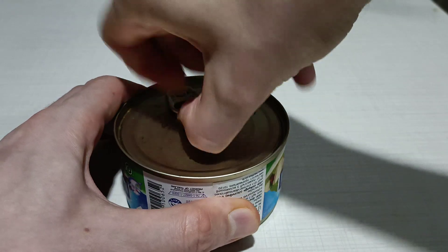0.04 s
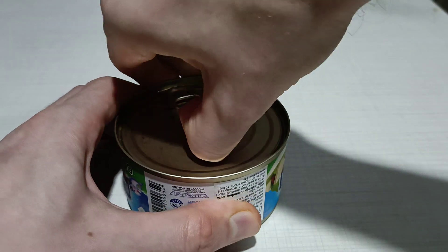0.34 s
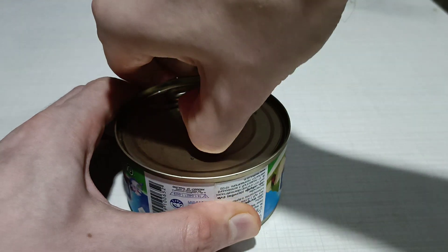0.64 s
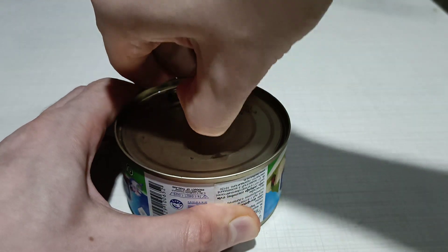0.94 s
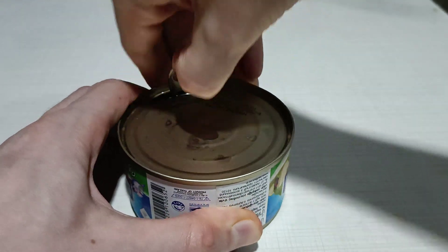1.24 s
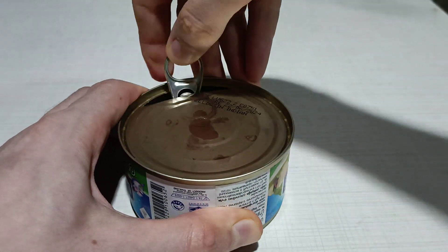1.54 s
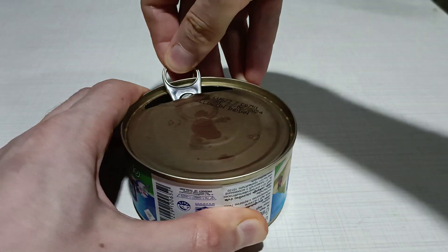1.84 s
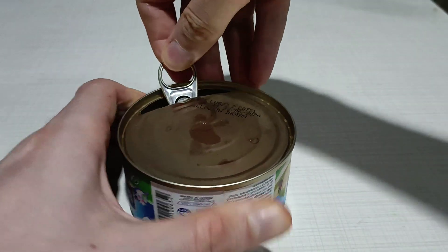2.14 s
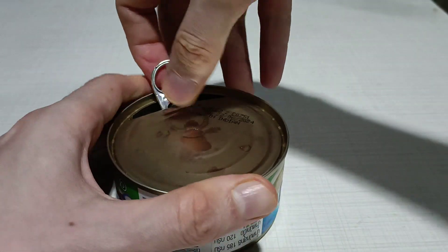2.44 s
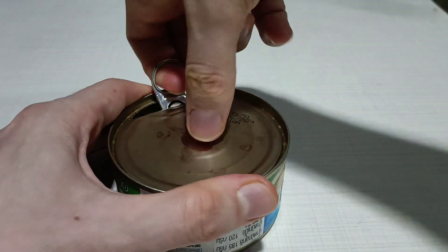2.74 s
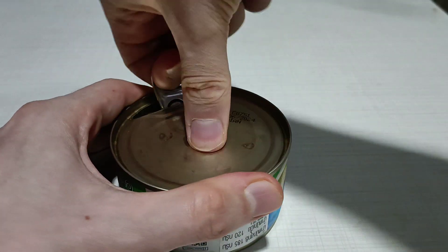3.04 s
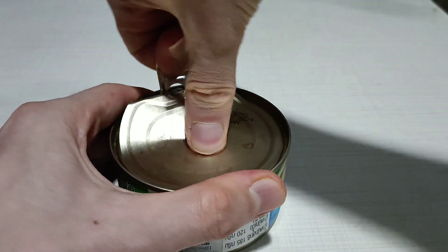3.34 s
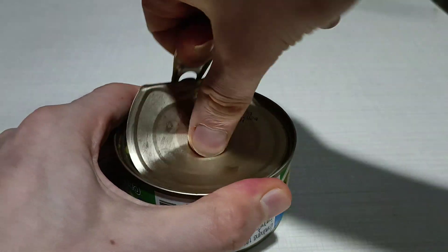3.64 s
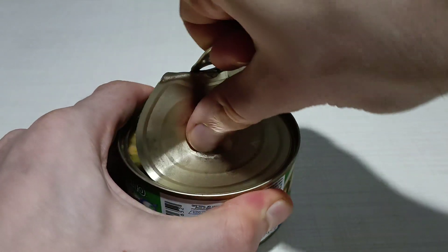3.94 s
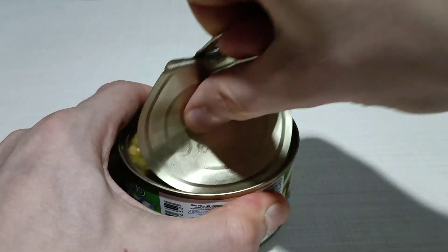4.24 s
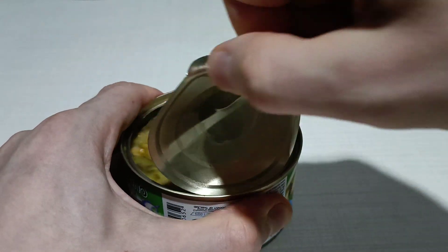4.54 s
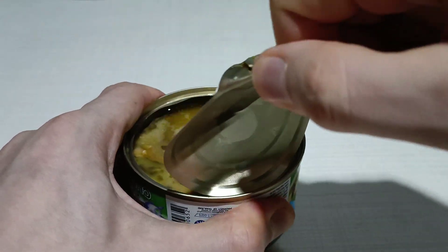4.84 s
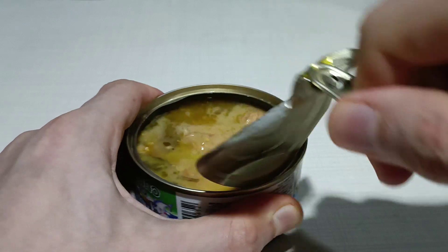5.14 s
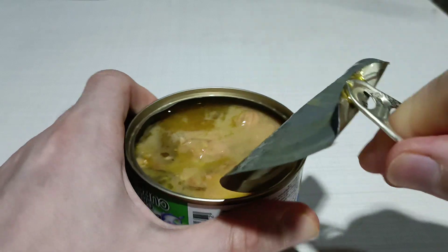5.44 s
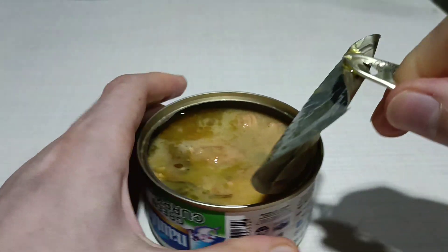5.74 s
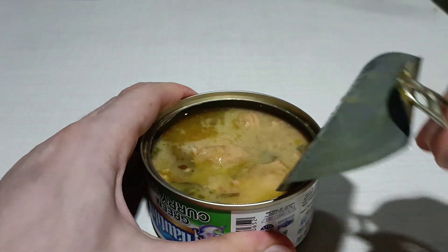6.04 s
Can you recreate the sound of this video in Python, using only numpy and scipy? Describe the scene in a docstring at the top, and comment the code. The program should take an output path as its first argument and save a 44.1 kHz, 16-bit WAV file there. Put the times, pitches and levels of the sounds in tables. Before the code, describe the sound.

A ring-pull food tin is opened on a table, close to the microphone in a small, quiet room. The tab clicks, air hisses briefly through the slit, and the lid gives a loud metallic pop. After faint ticks and finger rubbing, the seal cracks and the lid peels back in short, crackling pulls with thin squeaks. It snaps off at the rim, and the full tin knocks dully on the table.

```python
"""Opening a ring-pull food tin

On a table in a small room, close to a stereo pair and a little nearer the left microphone.
The tab pierces the lid with a pop, air hisses through the slit, and the score cracks open.
The lid peels back in six pulls, runs of tiny fractures that swell and stall; it snaps at the rim,
and the full tin knocks on the table. Behind it lie a short echo and the room's faint rumble and hum."""
import sys
import numpy as np
from scipy import signal
from scipy.fft import rfft, irfft
from scipy.io import wavfile
from scipy.ndimage import uniform_filter1d

SR = 44100
rng = np.random.default_rng(int(sys.argv[2]) if len(sys.argv) > 2 else 0)


def output_pcm(signal):
    """Save a mono or channel-first signal as 16-bit PCM at the path in sys.argv[1].

    Samples are clipped to [-1, 1] before scaling.
    """
    pcm = np.clip(np.atleast_2d(signal).T, -1, 1) * 32767
    wavfile.write(sys.argv[1], SR, np.round(pcm).astype(np.int16))


N = 267687
RING_T = np.arange(4096) / SR  # time axis of one ring, in seconds
BLOW_S = .006  # span over which a blow's level counts
TOP_HZ = 16050

# Pops of the taut lid. Each row: start in seconds, shell level in dB, lid ring in dB over the shell,
# treble tilt in dB per octave, lid pitch in Hz, tab ring in Hz, tab ring in dB over the shell.
LID_POPS = [ (.6216, -26, 3.5, 0, 872, 4250, 0), (1.142, -11.5, -14, -2, 806, 8230, 4),
            (1.1463, -16.5, -1.5, -7.5, 853, 8670, -3.5), (2.2555, -44, -13.5, 8, 890, 13000, 2.5),
            (3.286, -25, -30, 1, 870, 4710, -4), (3.289, -29, 3, -5, 866, 9800, -0.5), ]
# Pulls on the lid. Each row: start, moment the score gives way, length of the run and end in seconds,
# run level in dB, lid ring in dB over the shell, treble tilt in dB per octave, factor on lid pitch.
LID_PULLS = [ (3.293, 3.303, 0.029, 3.425, -34, 0.5, -10, 1.03),
             (3.577, 3.622, 0.018, 3.70, -46, 1, -11, .97), (3.71, 3.711, .012, 3.88, -44, 2.5, -6.5, 1.58),
             (4.086, 4.12, 0.089, 4.226, -52, 1.5, -11.5, 1.28),
             (4.23, 4.263, 0.028, 4.335, -36.5, -7, -9, 1.22),
             (4.919, 4.938, 0.03, 4.966, -46, -3.5, -4.5, 0.88), ]
# Longer pieces of the score letting go. Each row: start in seconds, level in dB.
SCORE_SNAPS = [(3.3179, -39), (3.3356, -39.5), (3.3427, -49), (3.383, -41.5), (3.4123, -39), (3.558, -63),
               (3.577, -59), (3.598, -56), (3.6066, -44), (3.623, -41), (3.663, -49), (3.7147, -42.5),
               (3.863, -62.5), (4.089, -53), (4.1205, -50), (4.135, -43.5), (4.234, -49), (4.9615, -32.5)]
# Dull thuds of the full tin: low body under pops and tears, and knocks on the table.
# Each row: start in seconds, level in dB, factor on the pitch.
TIN_THUDS = [(1.144, -24.5, 0.75), (2.565, -55, 0.45), (3.96, -51.5, 0.75), (4.291, -35.5, 0.79),
             (4.373, -51.5, 0.65), (4.921, -48, .52), (4.968, -46, 0.46), (5.0344, -38.5, .33),
             (5.036, -44.5, 1.65), (5.424, -49, 0.92), (5.546, -52, 1.1), (5.567, -29, 1.03)]
# Air through the slit. Each row: start, peak and end in seconds, peak level in dB.
AIR_PUFFS = [(0.61, 0.728, .90, -51.5), (0.851, .96, 1.08, -43)]
# Gliding tones. Each row: start and end in seconds, first pitch, last pitch and width in Hz, level in dB.
SLIT_WHISTLES = [(.955, .988, 5290, 3710, 610, -51), (.992, 1.012, 4900, 2930, 249.3, -44.5)]
HEADSPACE_HUM = [(.90, 1.09, 809.4, 700, 50.22, -69)]  # the space under the lid, as the air passes
STEEL_SQUEALS = [(.2, .36, 9300, 10400, 200, -82), (.32, .45, 10400, 8600, 200, -82),
                 (2.93, 3.16, 8600, 8800, 180, -77), (3.14, 3.28, 9100, 10300, 180, -75),
                 (3.08, 3.28, 11900, 13300, 180, -73), (4.11, 4.22, 3500, 3400, 350, -56),
                 (4.248, 4.276, 4000, 4350, 250, -46), (4.88, 4.96, 9500, 9300, 500, -70),
                 (4.935, 4.972, 4200, 4050, 500, -45)]
# Ticks of the strained tab. Each row: start in seconds, level in dB, treble tilt in dB per octave.
TAB_TICKS = [(1.421, -61, 12.5), (1.487, -52.5, 1), (1.5, -47.5, 3), (1.62, -62, 9.5), (2.195, -57.5, -5.5),
             (3.185, -52, 0), (3.196, -53.5, 11), (3.226, -53, -0.5), (3.2702, -44.5, 1.5),
             (5.1615, -54.5, 19), (5.19, -63, 12)]
# Firmer nudges on the closed lid. Each row: start in seconds, level in dB.
FINGER_NUDGES = [(0.37, -59), (1.815, -53), (2.178, -58.5), (2.893, -57), (3.0, -51.5)]
# Skin sliding on tin. Each row: start and end in seconds, level in dB before the trim.
GRIP_SLIDES = [(0.055, 0.153, -61), (1.993, 2.18, -57.5), (2.195, 2.323, -57.5), (2.767, 2.893, -52.5),
               (5.874, 5.983, -61)]

# Modes of the taut lid. Each row: factor on its pitch, level in dB, seconds to fall 60 dB.
TAUT_LID_MODES = [ (1, 0, .04), (1.3, -25, .035), (1.55, -23.5, .035), (1.94, -20.5, .03), (3.1, -20, .035),
                  ]
# Modes of torn lid and full tin. Each row: frequency in Hz, level in dB, seconds to fall 60 dB.
TORN_LID_MODES = [(300, -19, .04), (420, -14, .025), (560, -8, .02), (760, -4, .025), (885, 0, .035),
                  (1030, -5, .03), (1175, -2, .035), (1440, -6, .035), (1700, -7, .03), (1890, -9, .03),
                  (2600, -13, .02)]
FULL_TIN_MODES = [(338, -15.5, .04), (480, -10, .02), (750, -2.5, 0.036), (860, -3, 0.035),
                  (1150, -10.5, 0.0091), (1440, -9, .02), (1620, -11, .015), (1898, -7.5, 0.019),
                  (2270, -11.5, 0.01), (2890, -20.5, 0.016)]
# Clear modes of the tin's wall. Each row: frequency in Hz, level in dB.
WALL_MODES = [(2540, -12), (2720, -9), (3870, -7), (4175, -2.5), (4370, 0), (4660, -2), (5380, -12),
              (7960, -5), (8420, -8), (8820, -6), (9070, -6)]
# Noise colours of the sources. Each row: frequency in Hz, relative spectral density in dB.
SHELL_SPECTRUM = [(300, -24), (900, -16.5), (2000, -9.5), (2700, -12.5), (3250, -4), (4350, -1.5),
                  (5100, -11.5), (6200, -2.5), (7200, -10), (8100, 1.5), (9400, 1), (11000, -4.5),
                  (12300, -7), (13400, 2.5), (16000, -5)]
CLUNK_SPECTRUM = [(150, -17.5), (420, 2), (560, -9.5), (820, 5.5), (1200, -7), (1650, -4), (2500, -15),
                  (3600, -29.5), (6000, -43)]
HISS_SPECTRUM = [(500, -31.5), (2500, -21), (3800, -4.5), (5500, -4), (7200, -10), (8800, 6), (11500, -4),
                 (13800, -0.5), (16000, -6)]
SKIN_SPECTRUM = [(500, 6.5), (1600, -6), (3300, -1), (4500, -0.5), (6500, -12), (9500, 4.5), (12500, -7),
                 (16000, -2.5)]
ROOM_TONE_SPECTRUM = [(25, -19.5), (50, -11), (90, 0.5), (160, -12.5), (230, -4.5), (400, -12), (630, -21),
                      (900, -22.5), (1300, -27.5), (2500, -32), (4500, -32), (5300, -40.5), (7200, -40.5),
                      (8500, -33), (12000, -39), (13500, -31)]

# The room's hum. Each row: frequency in Hz, width in Hz, level in dB.
ROOM_HUM = [(90.1, 74, -75.5), (134.1, 11, -69.5), (214.5, 31, -76)]
# The tin's balance at the microphones. Each row: frequency in Hz, left minus right in dB.
MIC_BALANCE = [(300, 4), (850, -3), (1500, 2.5), (2700, 4), (4500, 3.5), (8500, 8.5), (14000, 7.5)]
# Decay of the room's echo. Each row: frequency in Hz, seconds to fall 60 dB.
ECHO_T60 = [(150, 0.31), (700, 0.29), (2000, 0.21), (4500, 0.3), (9000, 0.33), (16000, .24)]
# Colour of the room's echo. Each row: frequency in Hz, gain in dB.
ECHO_COLOUR = [(100, 4), (700, -2.5), (2500, 3), (4500, -6.5), (9000, -9), (12000, -6), (16000, -10.5)]


def pops(tab_width_hz=1100, snap_t60=.011):
    """The score gives way: the tab rings and the taut lid sounds like a small drum, more to the right."""
    out = np.zeros((2, N))
    for start, db, lid_db, tilt_db, lid_hz, tab_hz, tab_db in LID_POPS:
        drum = amp(lid_db) * low_cut(ring(TAUT_LID_MODES, lid_hz, scatter_db=1), hz=560, order=3)
        tab = np.array([fuzzy_tone(np.full(len(RING_T), tab_hz), tab_width_hz) for side in range(2)])
        tab = per_blow(tab * amp(-60 * RING_T / snap_t60))
        steel = shell(tilt_db, snap_t60) + amp(tab_db) * tab
        add(out, start, amp(db) * (steel * amp([[-3], [2]]) + drum * amp([[-5], [1.5]])))
    return out


def pulls(slips_per_s=600, spread_db=4.5):
    """Each pull is a run of tiny uneven fractures along the score, which ring shell and lid."""
    out = np.zeros((2, N))
    for start, gives_way, run_s, end, db, lid_db, tilt_db, pitch in LID_PULLS:
        size = round((end - start) * SR)
        count = int(slips_per_s * size / SR) + 3
        spot, jitter, chance = rng.random((count, 3)).T
        force = amp(-spread_db * np.log(chance + .037))
        # the hand sets the mean power
        force /= np.sqrt(uniform_filter1d(force ** 2, size=12) * slips_per_s * BLOW_S)
        onsets = ((np.arange(count) + jitter) * size / count).astype(int)
        slips = np.zeros((3, size))  # three spots on the score, each with its own ring
        slips[(spot * len(slips)).astype(int), onsets] = force
        tear_db = tearing_db(start + np.arange(size) / SR, gives_way, run_s)
        for train in slips:
            flex = rng.uniform(.97, 1.03)
            shell_drive = train * amp(db + tear_db)
            lid_drive = train * lid_gain(db + lid_db, tear_db)
            add(out, start, signal.fftconvolve(shell_drive[None], shell(tilt_db), axes=1))
            add(out, start, signal.fftconvolve(lid_drive, ring(TORN_LID_MODES, pitch * flex)))
    return out


def tearing_db(t, gives_way, run_s, swell_db_per_s=345, stall_db_per_s=1200):
    """Level of a pull relative to its run: creep, swell, run, stall, dying creep."""
    creep_db, creep_fade_db_per_s = -20.5, 38
    before = np.maximum(gives_way - t, 0)
    after = np.maximum(t - gives_way - run_s, 0)
    run_db = -swell_db_per_s * before - stall_db_per_s * after
    return np.maximum(run_db, creep_db - creep_fade_db_per_s * after)


def lid_gain(run_ring_db, tear_db, follow=.55):
    """The lid's ring only partly follows the tear's level, so gentle tearing sounds duller."""
    return amp(run_ring_db + follow * tear_db)


def snaps(brighter_db_per_octave=3.5):
    """Single larger fractures, coloured like the pull under way or about to begin."""
    out = np.zeros((2, N))
    for start, db in SCORE_SNAPS:
        pull = next((row for row in LID_PULLS if start < row[3]), LID_PULLS[-1])
        *_, run_db, lid_db, tilt_db, pitch = pull
        lid = lid_gain(run_db + lid_db, db - run_db) * ring(TORN_LID_MODES, pitch)
        add(out, start, amp(db) * shell(tilt_db + brighter_db_per_octave) + lid)
    return out


def shell(tilt_db, snap_t60=.014, ring_t60=.12, ring_db=-19, wall_t60=.04, wall_db=-6.5, rise_s=.0005):
    """Thin steel, damped by food and hand: a snap of dense modes with a few clear ones ringing on."""
    tilt_db = np.clip(tilt_db, -12, 8)
    fade = amp(-60 * RING_T / snap_t60) + amp(ring_db - 60 * RING_T / ring_t60)
    dense = per_blow(noise(len(RING_T), SHELL_SPECTRUM, tilt_db, mono_hz=2850) * fade)
    modes = [(hz, db + tilt_db * np.log2(hz / 6000), wall_t60) for hz, db in WALL_MODES]
    strain = 1 + .006 * rng.standard_normal()
    clear = np.array([ring(modes, strain, scatter_db=3) for side in range(2)])
    growth = 1 - np.exp(-RING_T / rise_s)  # a fracture takes a moment to run
    return per_blow((dense + amp(wall_db) * clear) * growth)


def thuds(clunk_db=-2, clunk_t60=.024, modes_db=-3, contact_db=-24):
    """The full tin answers a jolt with a dense clunk, a few low, short modes and a faint wall tick."""
    out = np.zeros((2, N))
    for start, db, pitch in TIN_THUDS:
        dense = noise(len(RING_T), [(hz * pitch, level) for hz, level in CLUNK_SPECTRUM], mono_hz=3010)
        clunk = amp(clunk_db) * per_blow(dense * amp(-60 * RING_T / clunk_t60))
        modes = amp(modes_db) * ring(FULL_TIN_MODES, pitch, scatter_db=1)
        contact = amp(contact_db) * shell(tilt_db=-6)
        add(out, start, amp(db) * (clunk + modes + contact))
    return out


def air(sputter_db=2, edge_db=-17, close_s=.04):
    """Air sputters through the wet slit in two puffs, whistles, and sets the space under the lid humming."""
    t, flow = np.arange(N) / SR, np.zeros(N)
    for start, peak, end, db in AIR_PUFFS:
        off_peak = np.interp(t, [start, peak, end], [-1, 0, 1])
        gate = (t > start) * np.clip((end - t) / close_s, 0, 1)
        flow += amp(db + edge_db * off_peak ** 2) * gate
    sputter = evened(uniform_filter1d(rng.standard_normal(N), size=130))
    hiss = noise(N, HISS_SPECTRUM) * flow * amp(sputter_db * sputter) * amp([[0], [-3]])
    return hiss + glides(SLIT_WHISTLES, octave_db=-3) + glides(HEADSPACE_HUM, octave_db=-15.5)


def squeals():
    """Strained steel gives thin, gliding squeals."""
    return glides(STEEL_SQUEALS, octave_db=-22)


def ticks(lid_db=-17):
    """The tab ticks against the shell and barely stirs the lid."""
    out = np.zeros((2, N))
    for start, db, tilt_db in TAB_TICKS:
        add(out, start, amp(db) * (shell(tilt_db) + amp(lid_db) * ring(TORN_LID_MODES, pitch=.91)))
    return out


def fingering(start=1.45, end=3.05, taps_per_s=40, tap_db=-70, spread_db=2, lid_hz=900, contact_db=-12):
    """Fingers working the tab keep nudging the lid, which rings faintly."""
    out = np.zeros((2, N))
    for when, chance in rng.random((int(taps_per_s * (end - start)), 2)):
        force = amp(tap_db - spread_db * np.log(chance + .07))
        add(out, start + when * (end - start), force * ring(TAUT_LID_MODES, lid_hz))
    for onset, db in FINGER_NUDGES:
        add(out, onset, amp(db) * (ring(TAUT_LID_MODES, lid_hz) + amp(contact_db) * shell(tilt_db=-16)))
    return out


def slides(trim_db=-7):
    """Soft friction of skin on tin as the grip shifts."""
    out = np.zeros((2, N))
    for start, end, db in GRIP_SLIDES:
        size = round((end - start) * SR)
        add(out, start, amp(db + trim_db) * noise(size, SKIN_SPECTRUM) * signal.windows.tukey(size, .6))
    return out


def direct(x, left_lead_samples=9):
    """The tin is nearer the left microphone and radiates unevenly to the two sides."""
    pan_db = curve_at(MIC_BALANCE, np.fft.rfftfreq(N, 1 / SR))
    sides = amp(np.array([pan_db, -pan_db]) / 2)
    left, right = irfft(rfft(x) * sides / np.sqrt((sides ** 2).mean(0)), N)
    return np.array([np.roll(left, -left_lead_samples), right])


def room_echo(x, wet_db=-8, build_s=.0093, reflections_per_s=4000):
    """Sparse reflections off near walls, each band dying at its own speed."""
    size = SR * 2 // 3
    taps = rng.standard_normal((2, size)) * (rng.random((2, size)) < reflections_per_s / SR)
    taps *= 1 - np.exp(-(np.arange(size) / SR / build_s) ** 2)  # the first walls are some way off
    hz, t, bands = signal.stft(taps, SR, nperseg=256)
    bands *= amp(-60 * t / curve_at(ECHO_T60, hz)[:, None])
    _, plain = signal.istft(bands, SR, nperseg=256)
    _, coloured = signal.istft(bands * amp(curve_at(ECHO_COLOUR, hz))[:, None], SR, nperseg=256)
    tail = coloured / np.linalg.norm(plain[0])
    return amp(wet_db) * signal.fftconvolve(x, tail, axes=1)[:, :N]


def room_tone(floor_db=-60.5):
    """The room behind the tin: low rumble, a blurred hum and faint hiss."""
    hum = sum(amp(db) * fuzzy_tone(np.full(N, hz), width) for hz, width, db in ROOM_HUM)
    floor = amp(floor_db) * noise(N, ROOM_TONE_SPECTRUM, mono_hz=886)
    return low_cut(floor + hum, hz=42.6, order=5)


def ring(modes, pitch, scatter_db=4.5):
    """Damped modes, their frequencies multiplied by pitch; each blow weights them differently."""
    hz, db, t60 = np.transpose(modes)[:, :, None]
    weight_db = scatter_db * rng.standard_normal(hz.shape)
    sign = rng.choice([-1, 1], hz.shape)
    fade = amp(db + weight_db - 60 * RING_T / t60)
    return per_blow((sign * fade * np.sin(2 * np.pi * hz * pitch * RING_T)).sum(0))


def glides(rows, octave_db):
    """Narrow gliding tones with a weaker octave."""
    out = np.zeros((2, N))
    for start, end, first_hz, last_hz, width, db in rows:
        hz = np.geomspace(first_hz, last_hz, round((end - start) * SR))
        octave = amp(octave_db) * fuzzy_tone(2 * hz, 2 * width) * (2 * hz < TOP_HZ)
        add(out, start, amp(db) * (fuzzy_tone(hz, width) + octave) * signal.windows.tukey(len(hz), .5))
    return out


def fuzzy_tone(hz, width_hz):
    """Noise in a narrow resonance that follows the curve hz."""
    pole = np.exp(-np.pi * width_hz / SR)
    white = [1, 1j] @ rng.standard_normal((2, len(hz)))
    drift = signal.lfilter([1], [1, -2 * pole, pole * pole], white)
    return evened((drift * np.exp(2j * np.pi * np.cumsum(hz) / SR)).real)


def noise(size, spectrum, tilt_db=0, mono_hz=300):
    """Coloured noise, alike at both microphones below mono_hz; tilt_db is per octave above 2 kHz."""
    hz = np.fft.rfftfreq(size, 1 / SR)
    left, other = rfft(rng.standard_normal((2, size)))
    shared = .95 / (1 + (hz / mono_hz) ** 2)
    right = shared * left + np.sqrt(1 - shared ** 2) * other
    colour = amp(curve_at(spectrum, hz) + tilt_db * np.log2(np.maximum(hz, 2000) / 6000))
    return evened(irfft(np.array([left, right]) * colour * (hz < TOP_HZ), size))


def amp(db):
    """Decibels to amplitude."""
    return 10 ** (np.asarray(db) / 20)


def evened(x):
    """Scales to unit RMS."""
    return x / np.sqrt(np.mean(x ** 2) + 1e-30)


def per_blow(x):
    """Gives a ring the energy of a unit level held for one blow."""
    return evened(x) * np.sqrt(BLOW_S * SR / x.shape[-1])


def curve_at(points, hz):
    """Interpolates a table over log frequency."""
    table_hz, value = np.transpose(points)
    return np.interp(np.log(hz + 1), np.log(table_hz + 1), value)


def add(mix, start, sound):
    """Mixes a sound in at start seconds."""
    part = mix[:, round(start * SR):][:, :sound.shape[-1]]
    part += sound[..., :part.shape[1]]


def low_cut(x, hz, order):
    """High-pass filter."""
    return signal.sosfilt(signal.butter(order, hz, "highpass", fs=SR, output="sos"), x)


def scene():
    """Tin and hands close to the microphones, the small room around them."""
    tin = pops() + ticks() + pulls() + snaps() + thuds() + fingering() + air() + slides() + squeals()
    tin = low_cut(tin, hz=170, order=2)  # little of the tin's sound reaches below about 170 Hz
    return direct(tin) + room_echo(tin) + room_tone()


def record(dry, limit_db=-19, recovery_db_per_s=160):
    """A limiter ducks the loudest pops and lets their echo swell back; a low-pass trims the very top."""
    power_db = 10 * np.log10(abs(uniform_filter1d((dry ** 2).mean(0), size=180)) + 1e-12)
    fall_db = np.arange(N) * recovery_db_per_s / SR
    held_db = np.maximum.accumulate(power_db + fall_db) - fall_db
    over_db = np.maximum(held_db - limit_db, 0)
    ducked = dry / amp(uniform_filter1d(over_db, size=60))
    low_pass = signal.firwin(401, TOP_HZ, window=("kaiser", 9), fs=SR)
    return signal.oaconvolve(ducked, low_pass[None], "same", axes=1)


dry = scene()
out = record(dry)
output_pcm(out)
```